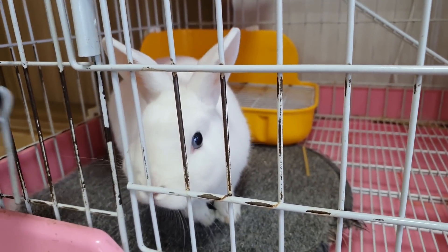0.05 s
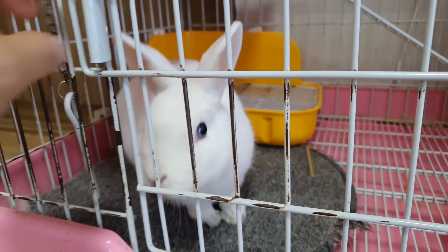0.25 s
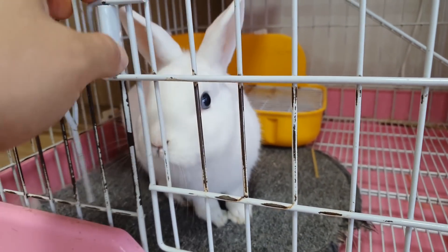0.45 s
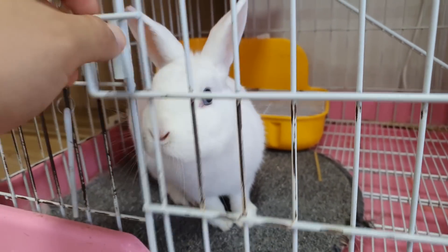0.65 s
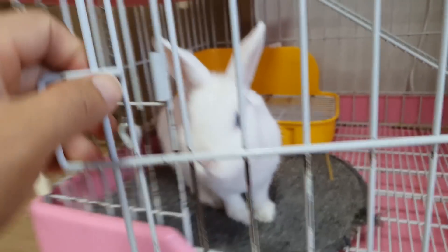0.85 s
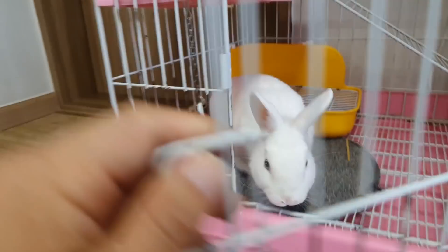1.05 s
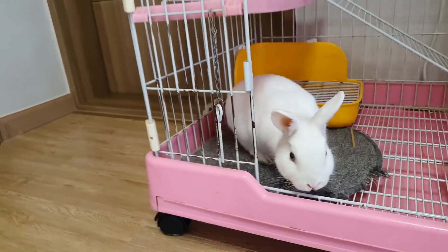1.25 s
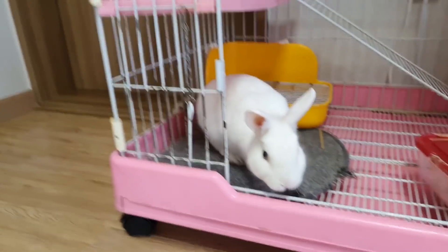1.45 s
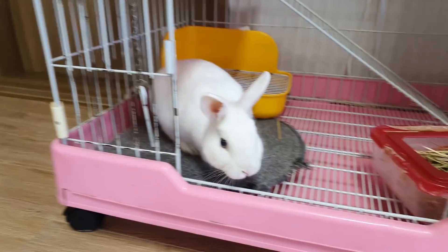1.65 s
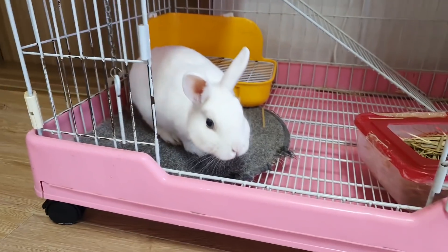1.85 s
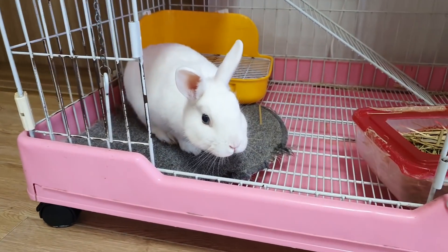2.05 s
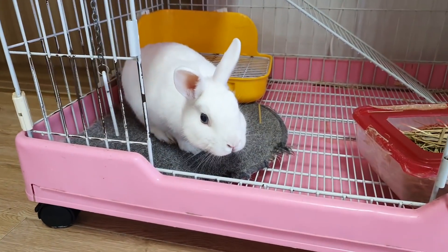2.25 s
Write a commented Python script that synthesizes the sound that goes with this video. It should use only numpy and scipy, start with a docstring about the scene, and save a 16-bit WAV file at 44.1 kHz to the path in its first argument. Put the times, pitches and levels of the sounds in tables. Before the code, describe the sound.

Metal cage door opening with a ringing latch snap, a scraping creak and a hinge squeak.

```python
"""A hand opens a wire pet cage in a small room. The spring latch clacks and rings (0.2 s); the door
clanks loose (0.4 s); the cage floor booms after both. Wire drags on wire: the door scrapes, creaks
and groans by stick-slip (from 0.8 s), then briefly screeches (1.0 s). The hinge squeaks (1.25 s),
first chattering, then a wavering whistle. A soft thump, as on the hollow plastic base, follows (2.2 s).
Room air, hand rustle and low rumble throughout."""
import sys
import numpy as np
from scipy import signal
from scipy.fft import rfft, irfft, next_fast_len
from scipy.io import wavfile
from scipy.ndimage import map_coordinates

SR = 44100
rng = np.random.default_rng(int(sys.argv[2]) if len(sys.argv) > 2 else 0)


def wav_record(signal):
    """Record a signal, one row per channel, as 16-bit PCM in the file named by sys.argv[1]."""
    frames = np.transpose(np.atleast_2d(signal))
    bounded = np.clip(frames, -1, 1)
    # unit amplitude maps onto the largest positive 16-bit level
    quanta = np.round(bounded * 32767).astype(np.int16)
    wavfile.write(sys.argv[1], SR, quanta)


N = 105840
T = np.arange(N) / SR


# bolt contacts (time [s], crack level [dB], ring level [dB])
LATCH_HITS = [(0.19, -39.5, -72), (0.214, -38, -55), (0.2246, -17.5, -20.5), (0.237, -33.5, -35.5),
              (.248, -29.5, -31), (0.489, -51, -82), (0.807, -41.5, -72)]
# latch steel modes (frequency [Hz], gain [dB], t60 [s])
LATCH_MODES = [(916, -27.5, 1), (2084, -19.5, 0.21), (2745, -24, 0.494), (4720, -6, .08),
               (7570, -6.5, 0.095), (10380, -6.5, 0.13), (11434, 2.5, 0.24), (11530, -3, 0.19),
               (15230, -22, 0.27)]
# contact noise spectrum (frequency [Hz], gain [dB])
CRACK_SPECTRUM = [(200, -45), (640, -17), (1300, -17), (2200, -8), (3300, -12.5), (5800, -15), (7500, -11),
                  (9100, -21.5), (11400, -13.5), (15500, -20)]

def latch():
    """The bolt ticks, snaps home and rattles; its steel rings, the cage jangles."""
    envelope = strikes([(s, db) for s, db, _ in LATCH_HITS], t60_s=0.092, attack_s=0.002)
    crack = envelope * noise(CRACK_SPECTRUM)
    steel = ring(LATCH_MODES, [(s, db) for s, _, db in LATCH_HITS], attack_s=0.0024)
    return room(jangle(crack, ring_db=-12), wet_db=-10.5) + room(steel, wet_db=-23.5)


# main hinge mode (time [s], pitch [Hz], level [dB], roughness [0-1])
SQUEAK_TRACK = [(1.25, 2506, -56, 0.3), (1.264, 2500, -30.5, 0.1), (1.289, 2480, -34.5, 0.84),
                (1.32, 2523, -45, 0.5), (1.335, 2537, -32, 0.62), (1.399, 2503, -35, 0.37),
                (1.426, 2488, -41, 0.73), (1.531, 2485, -47, 0.72), (1.567, 2463, -35, 0.24),
                (1.742, 2474, -43.5, 0.02), (1.842, 2459, -46.5, 0.3), (1.898, 2472, -58.5, 0.1),
                (1.944, 2469, -53.5, 0.2), (2.06, 2478, -80, 0.3)]
# hinge overtones (multiple [1], gain [dB])
SQUEAK_OVERTONES = [(2, -15.5), (3, -23.5), (4, -29.5)]
# overtone envelope (time [s], gain [dB])
OVERTONE_ENV = [(1.25, 0.5), (1.45, -1), (1.54, -15), (1.66, 3), (1.76, -16.5)]
# lower hinge mode (time [s], level [dB])
LOW_SQUEAK_ENV = [(1.255, -58), (1.282, -31), (1.32, -40.5), (1.51, -51.5), (1.56, -66)]
# hinge catches (time [s], level [dB])
CATCH_HITS = [(1.262, -47), (1.331, -39)]
# catch spectrum (frequency [Hz], gain [dB])
CATCH_SPECTRUM = [(1500, -24), (3100, -1.5), (4500, -9), (6300, -13), (15000, -24)]

def squeak():
    """The hinge catches and chatters, two modes beating, then fades as a wavering whistle."""
    chatter_hz, chatter_depth, stutter_db = 150.5, 0.42, 4
    s, hz, db, rough = np.transpose(SQUEAK_TRACK)
    pitch_hz, rough = np.interp(T, s, hz), np.interp(T, s, rough)
    chatter = phase_of(chatter_hz + 20 * wobble(40))
    phase = phase_of(pitch_hz + 5 * wobble(30.1))
    phase += rough * (0.7 * wobble(350) + 0.28 * np.sin(chatter))
    flutter = 1 - chatter_depth * rough * np.cos(chatter)
    flutter *= amp((1.5 + stutter_db * rough) * wobble(110))
    overtones = sum(amp(gain_db + 4.5 * wobble(50)) * tone(k * phase, k * hz[0])
                    for k, gain_db in SQUEAK_OVERTONES)
    envelope = amp(1) * level(np.transpose([s, db]))
    whistle = envelope * (flutter * tone(phase, hz[0]) + level(OVERTONE_ENV) * overtones)
    lower = singing_wire(LOW_SQUEAK_ENV, 2364, [(1, 0)], gain_db=-1.5, drift_hz=12.7, rough=0.37)
    catches = strikes(CATCH_HITS, t60_s=0.21, attack_s=0.006)
    catches = catches * spread(slips(1200, scatter_db=1), colour(CATCH_SPECTRUM))
    return room(whistle + lower + catches, wet_db=-11.5)


# wire rubbing (time [s], level [dB])
SCRAPE_ENV = [(.48, -64), (.71, -70), (.8, -60.5), (.83, -47), (.9, -46), (1.02, -36.5), (1.15, -37),
              (1.23, -50.5), (1.35, -48.5), (1.5, -60), (1.75, -87.5)]
# slip spectrum (frequency [Hz], gain [dB])
RASP_SPECTRUM = [(300, -19.5), (600, -7), (1100, -17), (1700, -7), (3000, -7.5), (4200, -14), (7000, -21),
                 (15000, -44)]
# door wire resonances (frequency [Hz], width [Hz], gain [dB])
DOOR_MODES = [(973, 10.4, 6.5), (1224, 10, -2.5), (1448, 42, 3), (1489, 19, 4), (1958, 25, -5.5),
              (2451, 130, 2.5), (2920, 39, 0), (3193, 20.8, -2.5)]

def scrape():
    """Wire drags on wire: dense slips rasp and excite the door's resonances."""
    rate_per_s, envelope = 1500, level(SCRAPE_ENV)
    rasp = amp(-3.5) * envelope * spread(slips(rate_per_s, scatter_db=-3.5), colour(RASP_SPECTRUM))
    body = amp(3.5) * envelope * spread(slips(rate_per_s, scatter_db=4.5), resonances(DOOR_MODES))
    return room(jangle(rasp, ring_db=-0.5) + body, wet_db=-5.5)


# regular stick-slip (time [s], level [dB])
CREAK_ENV = [(.76, -77), (.8, -46), (.83, -34.5), (.94, -32), (1.04, -50), (1.1, -61.5)]
# door rattle spectrum (frequency [Hz], gain [dB])
RATTLE_SPECTRUM = [(200, -16.5), (400, -16.5), (650, 1), (1200, 0), (1600, 0.5), (2200, -6), (3000, -10),
                   (4300, -10), (7000, -22.5), (15000, -34.5)]
# wires tuned to the slip rate (multiple [1], gain [dB])
CREAK_HARMONICS = [(8, -1.5), (9, -5), (12, -18), (16, -8), (18, -18), (22, -14), (28, -19)]

def creak():
    """Steady stick-slip: each slip rattles the door; wires sing at multiples of the rate."""
    slip_hz, jitter_s, t60_s = 195.3, 0.00002, 0.072
    count = int(slip_hz * N / SR) - 3
    times_s = np.arange(1, count + 1) / slip_hz + jitter_s * rng.standard_normal(count)
    sizes = amp(2 * rng.standard_normal(count))
    pulses = np.bincount(np.round(times_s * SR).astype(int), sizes, N)[:N]
    burst = rng.standard_normal((2, N)) * amp(-60 * T / t60_s)
    rattle = amp(-6) * level(CREAK_ENV) * spread(convolve(pulses[None], burst), colour(RATTLE_SPECTRUM))
    wires = singing_wire(CREAK_ENV, slip_hz, CREAK_HARMONICS, gain_db=-7, drift_hz=0.91, rough=0.079)
    return room(rattle + wires, wet_db=-6.5)


# low wire (time [s], level [dB])
LOW_WIRE_ENV = [(.72, -58.5), (.78, -47), (.83, -36.5), (.895, -32), (.945, -33.5), (.98, -48), (1.06, -42),
                (1.22, -76)]
# low wire partials (multiple [1], gain [dB])
LOW_WIRE_PARTIALS = [(1, 0), (2, -10)]
# long bar, singing on (time [s], level [dB])
LONG_BAR_ENV = [(.72, -57), (.81, -36), (.95, -40), (1.06, -38), (1.2, -42), (1.55, -57), (2.4, -71.5)]
# long bar tightening, then relaxing (time [s], pitch [Hz])
LONG_BAR_PITCH = [(.74, 963), (1.12, 977), (1.2, 997), (1.26, 972)]
# short bar (time [s], level [dB])
SHORT_BAR_ENV = [(1.0, -68), (1.07, -37), (1.11, -29), (1.15, -35), (1.18, -55), (1.5, -72)]

def groan():
    """Three wires sing by friction as the door is pulled round."""
    bar_hz = np.interp(T, *np.transpose(LONG_BAR_PITCH))
    low_wire = singing_wire(LOW_WIRE_ENV, 775, LOW_WIRE_PARTIALS, gain_db=1.5, drift_hz=3.7, rough=0.18)
    long_bar = singing_wire(LONG_BAR_ENV, bar_hz, [(1, 0.5), (2, -10), (3, -19)],
                            gain_db=-4, drift_hz=4, rough=0.45)
    short_bar = singing_wire(SHORT_BAR_ENV, 1429, [(1, 0.5), (2, -18)],
                             gain_db=0, drift_hz=9.8, rough=0.15)
    return room(low_wire + long_bar + short_bar, wet_db=-13)


# steel biting (time [s], level [dB])
SCREECH_ENV = [(.995, -67), (1.02, -30), (1.036, -26.5), (1.066, -27.5), (1.085, -35.5), (1.115, -32),
               (1.16, -45), (1.23, -69)]
# fine slip spectrum (frequency [Hz], gain [dB])
GRIT_SPECTRUM = [(2500, -38), (4000, -11.5), (9000, -11.5), (10500, -1), (12000, 2), (14500, -6.5),
                 (15800, -12)]
# high steel resonances (frequency [Hz], width [Hz], gain [dB])
SHRILL_MODES = [(10775, 50, -1.5), (11540, 77, -2), (11970, 40, -0.5), (11970, 75.9, -2)]

def screech():
    """Bare steel bites briefly: fine, bright slips ring its highest modes."""
    grit = spread(slips(3000, scatter_db=-2), colour(GRIT_SPECTRUM))
    shrill = amp(-7) * spread(slips(3000, scatter_db=-1), resonances(SHRILL_MODES))
    envelope = level(SCREECH_ENV) * amp(0.5 + wobble(120))
    return room(envelope * (grit + shrill), wet_db=-8.5)


# door frame modes (frequency [Hz], gain [dB], t60 [s])
FRAME_MODES = [(1360, 4, 0.094), (1613, 1.5, 0.06), (2013, -1.5, 0.12), (3050, 2, 0.041)]

def clank():
    """The door frame jumps free and hits the bars: a short, hard ring."""
    return room(ring(FRAME_MODES, hits=[(0.3945, -35)], attack_s=0.00083), wet_db=-13.5)


# floor response to latch and clank (time [s], level [dB])
BOOM_HITS = [(0.229, -31), (0.397, -33.5)]
# cage floor spectrum (frequency [Hz], gain [dB])
BOOM_SPECTRUM = [(360, -19), (580, 0.5), (950, -5), (3000, -49.5)]

def boom():
    """The cage floor answers the two hard blows, slower and lower."""
    return room(strikes(BOOM_HITS, t60_s=0.23, attack_s=0.0026) * noise(BOOM_SPECTRUM), wet_db=-6.5)


# bumps on the cage (time [s], level [dB], tilt [dB/octave])
KNOCK_HITS = [(0.031, -50, -1), (0.109, -48.5, -3), (0.3925, -31, 3), (0.522, -42, -11), (0.618, -37, -9),
              (1.8, -44, 1.5)]
# bump spectrum (frequency [Hz], gain [dB])
KNOCK_SPECTRUM = [(100, -31.5), (440, -9.5), (1440, -2), (2100, -3), (3800, -23), (9000, -44.5)]

def knocks():
    """Hand and door bump dully on the cage frame."""
    bumps = sum(amp(db) * decay(s, t60_s=0.17, attack_s=0.006) * noise(KNOCK_SPECTRUM, tilt)
                for s, db, tilt in KNOCK_HITS)
    return room(bumps, wet_db=-4)


# blows on the base (time [s], level [dB])
THUMP_HITS = [(2.17, -37), (2.176, -46.5), (2.184, -40), (2.204, -47), (2.331, -53)]
# plastic base modes (frequency [Hz], gain [dB], t60 [s])
BASE_MODES = [(96, 1, 0.086), (143, -3, 0.34), (188.8, 3.5, 0.13), (256.7, -12, 0.44), (719, -14.5, 0.18)]
# soft contact spectrum (frequency [Hz], gain [dB])
THUD_SPECTRUM = [(35, -25.5), (80, 0), (450, 3.5), (1000, -18), (2200, -21), (5000, -42.5)]

def thump():
    """Soft blows thud on the hollow plastic base and ring its low modes."""
    thud = strikes(THUMP_HITS, t60_s=0.048, attack_s=0.0015) * noise(THUD_SPECTRUM)
    body = ring(BASE_MODES, THUMP_HITS, attack_s=0.0015)
    return room(amp(3.5) * thud + amp(-8) * body, wet_db=-6)


# hand movement (time [s], level [dB])
RUSTLE_ENV = [(0, -72), (.38, -65.5), (.46, -49), (.57, -60.5), (.74, -49.5), (1.2, -60.5), (1.84, -55),
              (2.1, -57.5)]
# hand rustle spectrum (frequency [Hz], gain [dB])
RUSTLE_SPECTRUM = [(50, -27.5), (140, -3.5), (420, -4.5), (3800, -27), (12000, -35.5)]
# handling rumble (time [s], level [dB])
RUMBLE_ENV = [(0, -70), (.8, -53), (1.1, -60.5), (2.0, -65.5), (2.4, -51.5)]
# room air spectrum (frequency [Hz], gain [dB])
AIR_SPECTRUM = [(25, -11.5), (75, -5), (230, -2), (600, -21), (1400, -16), (2500, -21.5), (5700, -27),
                (8400, -42.5), (11800, -28), (15500, -40)]

def background():
    """The hand shifting on the cage, low handling rumble, room air."""
    rustle = amp(-2 + 3.4 * wobble(25)) * level(RUSTLE_ENV) * noise(RUSTLE_SPECTRUM)
    rumble_spectrum = [(15, -11.5), (45, -5.5), (70, -4.5), (140, -21.5), (500, -77)]
    rumble = amp(-0.5) * level(RUMBLE_ENV) * noise(rumble_spectrum)
    return rustle + rumble + amp(-60.5) * noise(AIR_SPECTRUM)


def singing_wire(envelope, hz, partials, gain_db, drift_hz, rough):
    """Friction holds a wire at its own pitch, with jitter and flutter."""
    phase = phase_of(hz + drift_hz * wobble(34.9)) + 0.78 * rough * wobble(220)
    voice = sum(amp(db) * tone(k * phase, k * np.mean(hz)) * (1 + rough * wobble(59.98))
                for k, db in partials)
    return amp(gain_db) * level(envelope) * voice


def ring(modes, hits, attack_s):
    """Struck modes: decaying sines with slight phase wobble."""
    return sum(tone(2 * np.pi * (hz * T + rng.random()) + 0.45 * wobble(50), hz)
               * amp(db) * strikes(hits, t60_s, attack_s) for hz, db, t60_s in modes)


def slips(rate_per_s, scatter_db):
    """Two trains of irregular stick-slip impulses."""
    size = amp(scatter_db * (2 * rng.random((2, N)) - 1))
    return (rng.random((2, N)) < rate_per_s / SR) * size * rng.choice([-1, 1], (2, N))


def jangle(x, ring_db, mean_gap_hz=168.7, t60_s=0.18):
    """Add the cage's many wires ringing in sympathy, each at its own pitch."""
    wires = rng.random(N // 2 + 1) < SR / N / mean_gap_hz
    phasors = np.exp(2j * np.pi * rng.random((2, N // 2 + 1)))
    tail = irfft(wires * phasors, N) * amp(-60 * T / t60_s)
    tail = spread(tail, lambda hz: (hz > 1000) * (hz < 13000)) / np.sqrt(N)
    return x + amp(ring_db) * convolve(x, tail)


# room decay (frequency [Hz], t60 [s])
ROOM_T60 = [(1000, 0.55), (3000, 0.48), (15000, 0.24)]

def room(x, wet_db):
    """Add a small-room tail; treble dies first."""
    hz, t, bins = signal.stft(rng.standard_normal((2, N)), SR, nperseg=256)
    fade = amp(-60 * t / along(ROOM_T60, hz)[:, None])
    tail = signal.istft(bins * fade, SR, nperseg=256)[1][:, :N]
    tail = spread(tail * (1 - np.exp(-T / 0.0032)), np.ones_like) / np.sqrt(N)
    return x + amp(wet_db) * convolve(x, tail)


# left-right likeness (frequency [Hz], correlation [1])
COHERENCE = [(60, 0.88), (300, 0.94), (700, 0.66), (1400, 0.01)]

def stereo_angle(hz):
    """Half the phase gap between the ears, in radians."""
    return np.arccos(along(COHERENCE, hz)) / 2


def spread(pair, response):
    """Colour two unrelated signals; blend to stereo, rms 1."""
    blend = lambda hz: [np.cos(stereo_angle(hz)), np.sin(stereo_angle(hz))]
    mid, side = filtered(pair, lambda hz: response(hz) * blend(hz))
    return unit(np.array([mid + side, mid - side]))


def tone(phase, hz):
    """Stereo sine, rms 1; wider when high."""
    angle = stereo_angle(hz)
    return np.sqrt(2) * np.sin(phase + np.array([[angle], [-angle]]))


def noise(spectrum, tilt_db_per_oct=0):
    """Coloured stereo noise, rms 1."""
    tilt_db = lambda hz: tilt_db_per_oct * np.log2(np.maximum(hz, 200) / 1000)
    return spread(rng.standard_normal((2, N)), lambda hz: amp(along(spectrum, hz) + tilt_db(hz)))


def colour(spectrum):
    """Response through (frequency [Hz], gain [dB]) points."""
    return lambda hz: amp(along(spectrum, hz))


def resonances(modes):
    """Response of parallel resonators, alternating in sign."""
    return lambda hz: sum((-1) ** k * amp(db) * 1j * hz * width / (centre**2 - hz**2 + 1j * hz * width)
                          for k, (centre, width, db) in enumerate(modes))


def decay(s, t60_s, attack_s):
    """Envelope of a blow at time s."""
    age_s = np.maximum(T - s, 0)
    return amp(-60 * age_s / t60_s) * (1 - np.exp(-age_s / attack_s))


def strikes(hits, t60_s, attack_s):
    """Summed envelope of (time [s], level [dB]) blows."""
    return sum(amp(db) * decay(s, t60_s, attack_s) for s, db in hits)


def level(rows):
    """Gain through (time [s], level [dB]) rows, fading beyond the ends."""
    s, db = np.transpose(rows)
    outside_s = np.maximum(s[0] - T, 0) + np.maximum(T - s[-1], 0)
    return amp(np.interp(T, s, db) - 230 * outside_s)


def wobble(knots_per_s):
    """Smooth random curve."""
    return map_coordinates(rng.standard_normal(4096), [T * knots_per_s], mode="wrap")


def phase_of(hz):
    """Running phase in radians."""
    return 2 * np.pi * np.cumsum(hz) / SR


def along(points, hz):
    """Interpolate on a log frequency axis."""
    knots_hz, values = np.transpose(points)
    return np.interp(np.log(hz + 1), np.log(knots_hz + 1), values)


def filtered(x, response):
    """Apply a frequency response."""
    size = next_fast_len(N + SR // 2)
    return irfft(rfft(x, size) * response(np.fft.rfftfreq(size, 1 / SR)), size)[..., :N]


def convolve(x, tail):
    """Apply an impulse response."""
    return signal.fftconvolve(x, tail, axes=1)[:, :N]


def amp(db):
    """Decibels to gain."""
    return 10 ** (np.asarray(db) / 20)


def unit(x):
    """Scale to rms 1."""
    return x / np.sqrt(np.mean(x ** 2) + 1e-20)


# door balance (frequency [Hz], left minus right [dB])
DOOR_BALANCE = [(100, 0.5), (600, -0.5), (1300, -1.5), (2400, -8), (8000, -8.5), (15000, -3.5)]

def door_pan(hz):
    """Constant-power ear gains; treble leans right."""
    gap_db = along(DOOR_BALANCE, hz)
    return amp(gap_db * np.array([[.5], [-.5]])) / np.sqrt(np.cosh(gap_db * np.log(10) / 20))


def scene():
    """Panned door sounds, base thump, background."""
    door = latch() + clank() + boom() + knocks() + scrape() + creak() + groan() + screech() + squeak()
    return filtered(door, door_pan) + thump() + background()


def record(dry):
    """Brick-wall low-pass."""
    return filtered(dry, lambda hz: hz < 15950)


dry = scene()
out = record(dry)
wav_record(out)
```